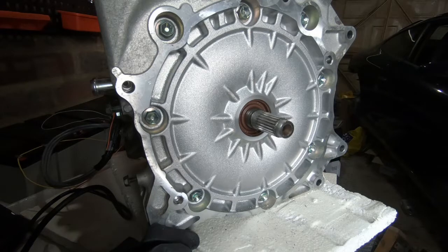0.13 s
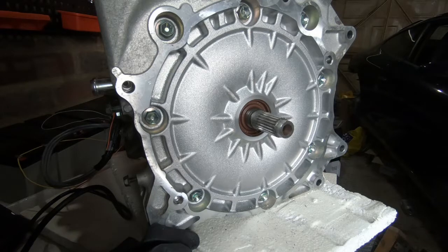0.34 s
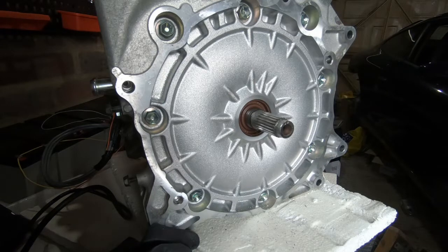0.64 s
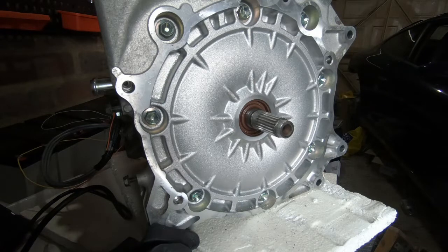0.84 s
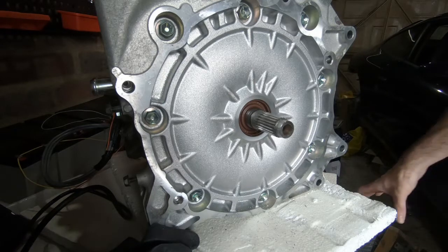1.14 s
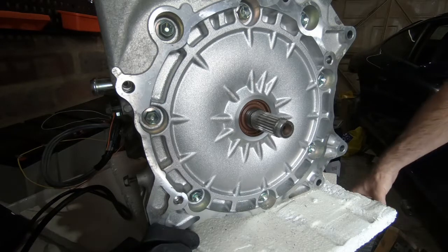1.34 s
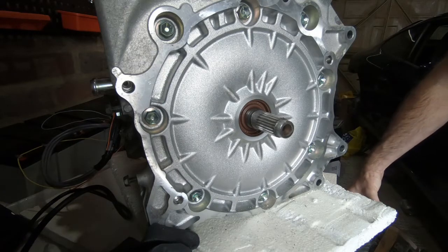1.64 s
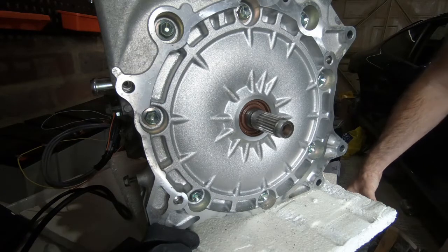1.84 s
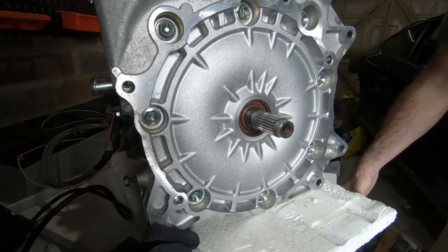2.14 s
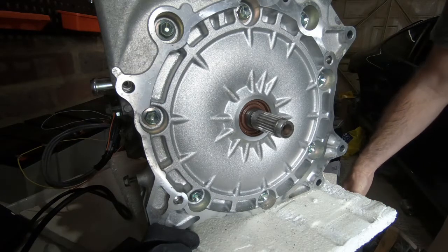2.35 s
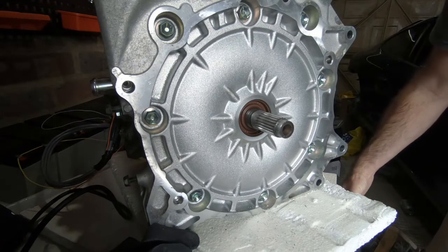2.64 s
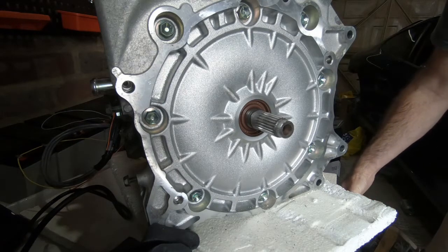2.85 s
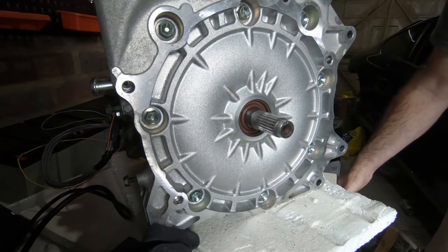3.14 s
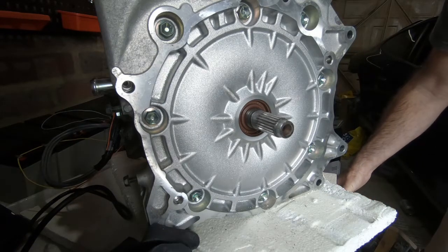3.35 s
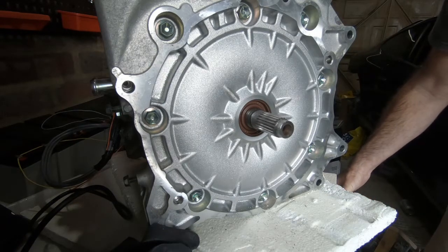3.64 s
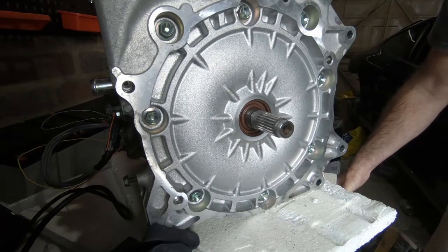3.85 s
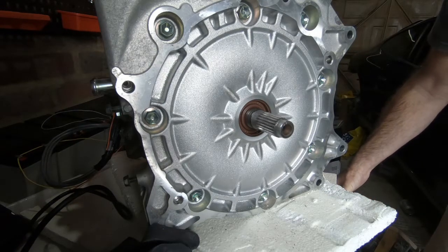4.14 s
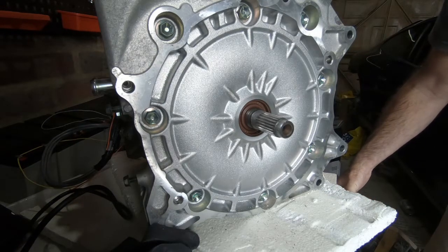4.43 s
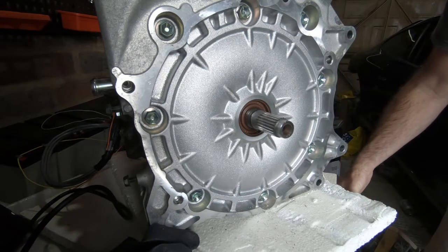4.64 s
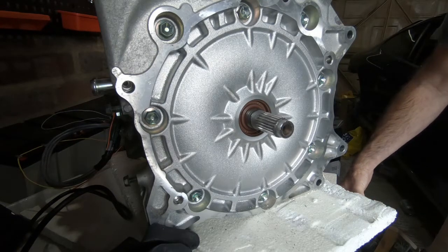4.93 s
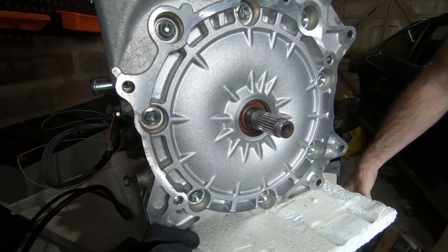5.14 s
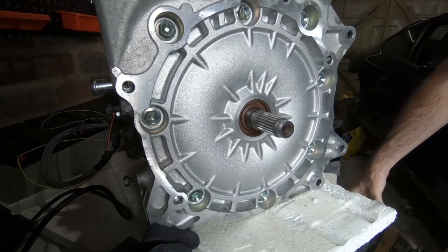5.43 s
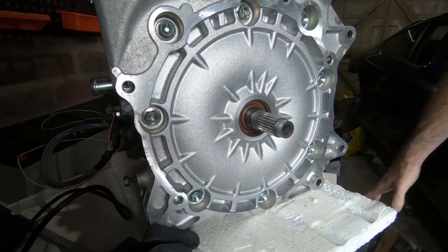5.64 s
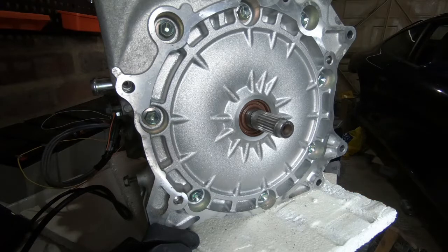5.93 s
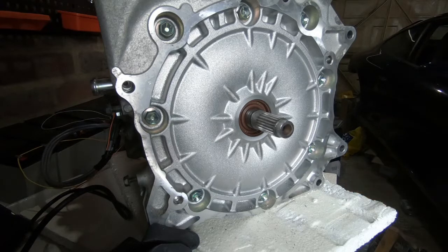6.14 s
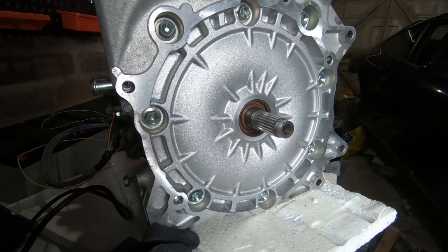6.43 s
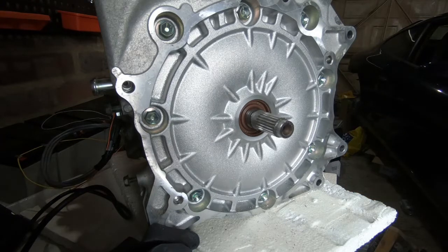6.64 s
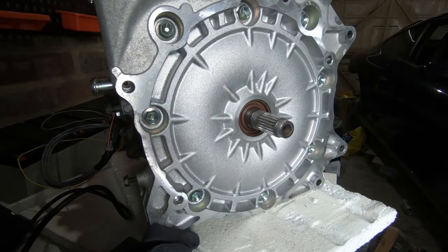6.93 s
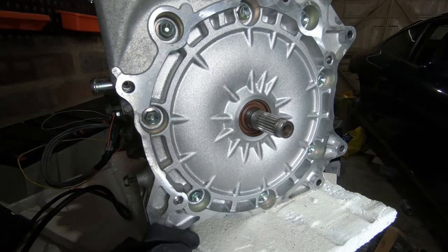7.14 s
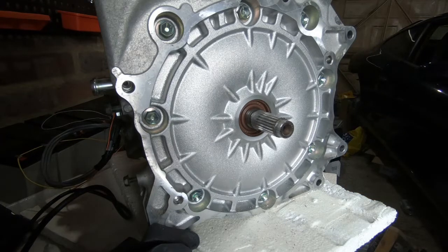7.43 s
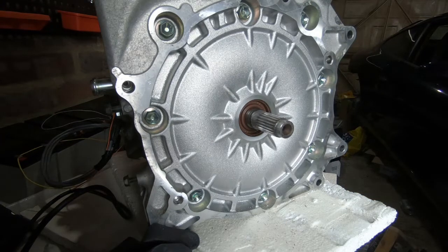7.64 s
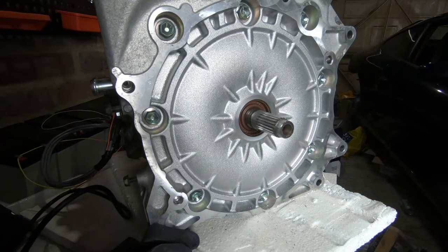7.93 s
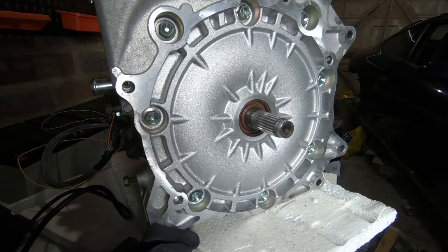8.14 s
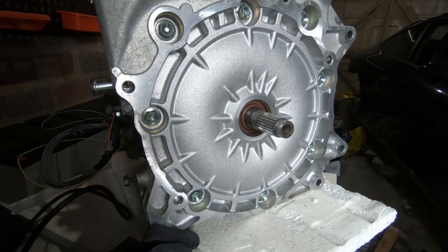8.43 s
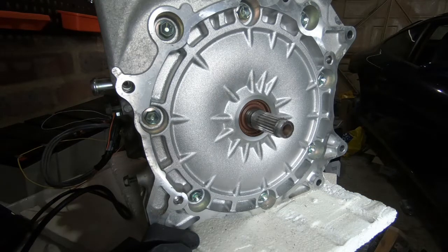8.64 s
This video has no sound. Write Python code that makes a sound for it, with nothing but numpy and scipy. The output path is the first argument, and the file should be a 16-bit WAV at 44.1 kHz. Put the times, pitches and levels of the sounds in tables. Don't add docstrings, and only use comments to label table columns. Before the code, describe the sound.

Deep buzzing motor hum shakes a workbench, sags in pitch and grows into distorted shuddering, then jumps back up and runs on smoothly until a sharp knock.

```python
import sys
import numpy as np
from scipy import signal
from scipy.fft import rfft, irfft, next_fast_len
from scipy.io import wavfile
from scipy.ndimage import uniform_filter1d

SR = 44100
rng = np.random.default_rng(int(sys.argv[2]) if len(sys.argv) > 2 else 0)


def invert_db(level):
    return 10 ** (np.asarray(level, dtype=float) / 20)


def store_wav(level_fs):
    pcm = np.round(np.clip(np.atleast_2d(level_fs), -1, 1) * 32767)
    wavfile.write(sys.argv[1], SR, pcm.T.astype(np.int16))


N = 387638



def ports(pan_db, db=0):
    return invert_db(db + np.reshape([pan_db, 0 * pan_db], (2, -1)))


def peak(x, hz, width):
    return signal.lfilter(*signal.iirpeak(hz, hz / width, fs=SR), x)


def walk(rate):
    k = int(SR / rate)
    held = np.repeat(rng.standard_normal(N // k + 1), k)
    return 1.1 * uniform_filter1d(uniform_filter1d(held, k), k)[:N]


def tone(phase, db, pan_db, lead):
    leads = np.array([lead + 0 * phase, 0 * phase])
    return np.sqrt(2) * ports(pan_db, db) * np.cos(phase + leads)


def bands(table, ref_hz, alike, lag, flicker_db):
    hz, db, pan_db = np.transpose(table)
    n = next_fast_len(N)
    f = np.maximum(np.fft.rfftfreq(n, 1 / SR), 1)
    both, left, right = rfft(rng.standard_normal((3, n)))
    shift = np.array([np.exp(2j * np.pi * f * lag / SR), 1 + 0 * f])
    pair = np.sqrt(alike) * both * shift + np.sqrt(1 - alike) * np.array([left, right])
    colour_db = np.interp(np.log(f), np.log(hz), db, -np.inf, -np.inf)
    pair = pair * ports(np.interp(np.log(f), np.log(hz), pan_db), colour_db)
    out = 0
    for centre in np.arange(np.log2(hz[0]), np.log2(hz[-1]) + 1):
        window = np.cos(np.pi / 2 * np.clip(np.log2(f) - centre, -1, 1)) ** 2
        out = out + irfft(pair * window, n)[:, :N] * invert_db(flicker_db * walk(9))
    return out * np.sqrt(SR / 2 / ref_hz)


def labouring(hz):
    return np.clip((56 - hz) / 5, 0, 1)


def ducking(t):
    # from_s, until_s, depth_db
    ducks = [
        (2.88, 5.38, -6),
        (7.7, 8.9, -1.05),
    ]
    attack_s, release_s = .15, .46
    gain_db = 0
    for start, end, db in ducks:
        sink = 1 - np.exp(-np.clip(t - start, 0, end - start) / attack_s)
        recover = np.exp(-np.maximum(t - end, 0) / release_s)
        gain_db = gain_db + db * sink * recover
    return gain_db


def motion(t, gain_db):
    # time_s, shaft_hz
    speed = [(0, 57.9), (.6, 57.65), (1.2, 58.45), (2.55, 58.55), (2.72, 57.2), (3.35, 51.2), (4.05, 46.66),
             (4.35, 45.2), (4.87, 43.45), (5.1, 51.6), (5.25, 54.9), (5.37, 58.3), (5.65, 60.25),
             (6.55, 60.8), (7.52, 60.85), (7.75, 63.3), (8, 64.45), (8.79, 65.1)]
    # shaft_hz, once_a_turn_db, twice_a_turn_db, fourth_order_db, sixth_order_db
    orders_db = [(43.8, -8.2, 1.6, -23, -19.5), (44.8, -9.1, 2.55, -20, -14), (45.4, -8, 2.1, -24, -18),
                 (46.3, -7.3, .8, -31, -27), (47.6, -8.9, 1.2, -39, -30.5), (49.6, -10.1, 2.35, -40, -31),
                 (51.8, -11.3, 2.05, -36, -35.5), (53.6, -12.6, 2.5, -30, -39),
                 (55.35, -13, -2, -35.5, -56), (57.3, -12.7, -10.8, -38, -60),
                 (58.6, -13.3, -10.6, -42.5, -60), (60.8, -13.9, -9.2, -46, -63),
                 (63.6, -14.3, -6.5, -46, -60), (65.1, -13.7, -8.2, -48, -62)]
    bench_lag_s, sweep_lag_s = .03, .23
    sweep_db_per_hz_s, high_sweep_db_per_hz_s = -.042, -.3
    s, hz = np.transpose(speed)
    hz = uniform_filter1d(np.interp(t, s, hz), size=SR // 16, mode="nearest")
    at_hz, *levels = np.transpose(orders_db)
    late_hz = np.interp(t - bench_lag_s, t, hz)
    once, twice, fourth, sixth = (np.interp(late_hz, at_hz, db) + gain_db for db in levels)
    racing = np.maximum(np.gradient(hz) * SR, 0)
    twice = twice + sweep_db_per_hz_s * np.interp(t - sweep_lag_s, t, racing)
    high_loss_db = high_sweep_db_per_hz_s * racing
    return hz, once, twice, fourth + high_loss_db, sixth + high_loss_db


def shaft(hz, once_db, twice_db, fourth_db, sixth_db):
    # shake_hz, lead_over_shaft_rad, pan_db, left_lead_rad
    bench = [(88, -4.15, -23.5, -2.5), (90.5, -4.1, -25, -2.4), (92.9, -3.4, -28, -1.8),
             (96.6, -3, -25, -1.3), (102.4, -2.7, -21, -1.1), (108.7, -2.9, -17.5, -.8),
             (113.9, -2.6, -10.5, -1.2), (116.8, -2.1, -9, -1.6), (119.2, -1.7, -11, -1.9),
             (121.3, -1.5, -15, -2.2), (125.5, -1.3, -21, -2.1), (129.6, -1, -24.5, -1.9)]
    # shaft_hz, lead_rad
    fourth_lead = [(49.5, -.7), (51, 1.4), (57, 1.3), (59, -1.4)]
    # order, level_db, pan_db
    weak = [(1.5, -16.5, -20.5), (5, -40, -11)]
    turn = 2 * np.pi * np.cumsum(hz) / SR + 4.6
    twice_db = twice_db + .5 * np.clip((sixth_db + 35) / 6, 0, 1)
    bench_hz, *response = np.transpose(bench)
    lead, pan_db, left_lead = (np.interp(2 * hz, bench_hz, r) for r in response)
    twice = 2 * turn + lead
    fourth = 2 * twice + np.interp(hz, *np.transpose(fourth_lead))
    out = tone(turn, once_db + .15 * walk(15), -15, -1.65)
    out += tone(twice, twice_db + .05 * walk(15), pan_db, left_lead)
    out += tone(fourth, fourth_db + walk(10), -17, -2.1)
    out += tone(3 * twice - 2.7, sixth_db, -15, 2.9)
    out += tone(turn + twice + .6, twice_db - 33 + walk(8), -16, 1.5)
    out += tone(turn + twice - 1.8, sixth_db - 11, -20, 1.5)
    free_db = -25 * labouring(hz)
    for order, db, weak_pan_db in weak:
        level_db = once_db + db + free_db * (order < 2) + 2.0 * walk(6.2)
        out += tone(order * turn - .6, level_db, weak_pan_db, 0.6)
    return out


def coil_hum(t, hum_db):
    # sideband_number, level_db, pan_db
    sidebands = [(-2, -18.5, 3), (-1, -8.5, 5), (0, 0, -13), (1, -5, 4.5), (2, -24.5, 0.5)]
    hum_hz, mains_hz = 1288.2, 49.6
    out = 0
    for k, db, pan_db in sidebands:
        phase = 2 * np.pi * (hum_hz + k * mains_hz) * t
        out = out + tone(phase, hum_db + db + 1.0 * walk(6.5), pan_db, 1.7)
    return out


def switching_whine(t, hum_db):
    # time_s, level_db
    swells = [(0.0, -74), (0.05, -75.5), (0.54, -75), (0.59, -69.5), (1.47, -73), (1.56, -80.5),
              (2.5, -66.5), (3.4, -76.5), (4.48, -72.5), (5.21, -82), (5.88, -76.5), (7.39, -74.5),
              (7.56, -66), (7.64, -73), (8.77, -71.5), (8.79, -71)]
    level_db = np.interp(t, *np.transpose(swells)) + 4.0
    phase = 2 * np.pi * 4394.5 * t + 0.44 * walk(10)
    out = tone(phase, level_db + 2.0 * walk(60) + .8 * walk(13), -1.5, 0.092)
    return out + tone(2 * phase, hum_db - 33.5 + 3 * walk(45), -1.5, .5)


def street(t):
    # traffic_db, tyres_db, rumble_db
    quiet_db = (-67, -65.5, -28.5)
    # middle_s, half_length_s, traffic_db, tyres_db,
    # rumble_db
    passes = [(0.494, .6, -59.5, -54.5, -27.5), (1.12, .4, -55, -55, -28), (1.6, 0.41, -59, -52, -27.5),
              (2.203, 0.43, -57, -51, -26.5), (3.099, .25, -55.5, -54, -26), (3.8, .6, -58, -54, -27),
              (4.4, 0.2, -51.5, -53.5, -26), (4.849, .5, -55.5, -52.5, -22.5), (5.401, 0.33, -59, -51, -31),
              (5.922, .35, -60, -50.5, -30), (6.748, 0.58, -63, -57.5, -34.5),
              (7.45, 0.36, -68.5, -63, -32)]
    power = invert_db(np.array(quiet_db))[:, None] ** 2
    for s, half, *db in passes:
        swell = 1 / (1 + ((t - s) / half) ** 4)
        power = power + (invert_db(np.array(db))[:, None] * swell) ** 2
    return 10 * np.log10(power)


def passing_traffic(traffic_db, tyres_db, rumble_db):
    # pitch_hz, level_db_per_hz, pan_db
    rumble = [(89, -20, -9.5), (130, -4.5, -9), (157, -9.5, -8), (246, -20.5, -6.5), (426, -27, -7),
              (654, -37, -11), (1540, -48, -4.5)]
    wash = [(500, -10, -6.5), (1000, 1.5, -5), (1380, 5, -4), (2100, -3.5, -4), (3700, -13.5, -5.5),
            (4770, -23.5, -4), (6500, -23, -4.5), (9200, -41.5, -5.5)]
    tyres = [(520, -22, -5), (760, -5.5, -2), (910, -0.5, -6), (1240, -2, -5.5), (1460, -12, -3),
             (2000, -25.5, -4.5)]
    out = invert_db(rumble_db) * bands(rumble, 120.0, 0.43, -6, 0.99)
    out += invert_db(traffic_db + 5.5) * bands(wash, 1750., 0.66, 4, 1.5)
    return out + invert_db(tyres_db + 4.0) * bands(tyres, 430.0, 0.15, 7.8, 2.1)


def engines(t):
    # middle_s, half_length_s, pitch_hz, level_db, pan_db
    engine_notes = [
        (.8, .8, 138, -40, -2),
        (.4, .25, 42, -35, -3),
        (.9, .25, 36, -37, -3),
        (2.45, .4, 135, -40, -2),
        (2.3, .2, 42, -35, -3),
        (2.7, .35, 68, -28, -5),
        (2.75, .2, 42, -29, -4),
        (6.5, .8, 38, -35, -2),
        (6.4, .35, 72, -36, -2),
        (7.5, .15, 225, -50, -2),
    ]
    out = np.zeros((2, N))
    for s, half, hz, db, pan_db in engine_notes:
        swell = np.cos(np.pi / 2 * np.clip((t - s) / half, -1, 1))
        phase = 2 * np.pi * hz * t + 1.5 * walk(6.5)
        out += swell * tone(phase, db + 2.5 * walk(11.0), pan_db, 0.47)
    return out


def room_floor(shaft_hz, hum_db):
    # pitch_hz, level_db_per_hz, pan_db
    hiss = [(2000, -7.5, -4), (4620, -6.5, -3.5), (6000, 0, -7), (9000, -5.5, -4), (11200, -10.5, -5),
            (12900, -16.5, -6.5), (13600, -30.5, -5.5)]
    deep = [(14.1, -7, -5.5), (25, -4.5, -7.5), (45, 0, -6), (79, -3.5, -10), (114, -6, -9),
            (161, -22, -10)]
    out = invert_db(1.219 * hum_db - 8) * bands(hiss, 3000., 0.27, 1.7, 0.87)
    deep_db = hum_db + 22 - 3.2 * labouring(shaft_hz)
    return out + invert_db(deep_db) * bands(deep, 100., 0.84, -3.5, 0.97)


def drones(hum_db):
    # pitch_hz, width_hz, level_over_hum_db, pan_db
    lines = [(100, 3, 7, -2), (199.5, 3, 2, -4), (245, 3, -5, -3), (317.6, 3, -4, -3)]
    out = np.zeros((2, N))
    for hz, width, db, pan_db in lines:
        noise = peak(peak(rng.standard_normal(N), hz, width), hz, 4 * width)
        noise = noise * np.sqrt(SR / np.pi / width)
        out += ports(pan_db, db) * invert_db(hum_db + 3.7 * walk(1.6)) * noise
    return out


def creaks():
    # start_s, peak_db, low_share_db
    slips = [(0.5665, -46, -3), (0.9833, -53, 4), (1.0984, -57.5, 6), (1.1995, -61, 8), (1.2694, -60, 3.5),
             (1.7813, -48.5, 6), (2.2101, -43, 2.1), (2.4496, -59, 9.5), (3.8489, -56.5, 2),
             (4.1509, -58, 4), (4.3108, -56.5, 5.5), (4.4469, -57, 12.5), (6.7393, -38, -13),
             (6.7985, -54, -2.5), (7.19, -52, -9), (7.271, -47, -6), (7.3952, -44.5, -16.5),
             (7.4928, -22.5, -23), (7.4997, -25, -20.5), (7.507, -31, -6), (7.5291, -38, -9.5),
             (7.5593, -39, -17), (7.9397, -58.5, 0)]
    # pitch_hz, width_hz, level_db
    case = [(505, 200, -1.5), (835, 400, 1.5), (1430, 260, 4.5), (2850, 2300, 0.5), (6700, 1200, -4),
            (7700, 2100, -1), (9200, 4300, -11.5)]
    scrape_t60_s, scrape_db = .2, -8.5
    n = SR // 3
    out = np.zeros((2, N + SR))
    t = np.arange(n) / SR
    tick = 1.2 * np.exp(-(t - .001) ** 2 / .0006 ** 2)
    fade = (1 - np.exp(-t / 0.0015)) * 1000. ** (-t / scrape_t60_s)
    for s, db, low_db in slips:
        both, grain, *own = rng.standard_normal((4, n))
        scrape = fade * invert_db(scrape_db + 33 * uniform_filter1d(grain, size=60))
        rub = np.array([both, np.roll(both, shift=1)]) + 0.57 * np.array(own)
        push = rub * (tick + scrape)
        ring = 0
        for hz, width, mode_db in case:
            mode = peak(peak(push, hz, width), hz, width) / np.sqrt(width / 3000)
            ring = ring + invert_db(mode_db + low_db * (hz < 4500)) * mode
        out[:, int(s * SR):][:, :n] += ports(-5.5, db + 3.5) * ring
    return out[:, :N]


def knocks():
    # start_s, level_db, pitch_hz, t60_s
    hits = [(7.4945, -28, 1350, .03), (7.496, -30, 750, .05), (7.502, -28, 450, .06), (7.5, -34, 2300, .04),
            (7.514, -33, 1200, .05), (7.56, -42, 900, .05), (6.745, -44, 1700, .08), (6.76, -41, 1100, .12),
            (6.79, -46, 1200, .1), (6.93, -46, 1000, .1), (7.29, -46, 550, .08), (2.6, -45, 900, .05),
            (4.447, -53, 3300, .04)]
    out = np.zeros((2, N + SR))
    t = np.arange(SR // 8) / SR
    for s, db, hz, t60 in hits:
        contact = rng.standard_normal((2, len(t))) * 1000. ** (-t / t60)
        ring = peak(peak(contact, hz, hz / 2), hz, hz) * np.sqrt(SR / hz)
        out[:, int(s * SR):][:, :len(t)] += ports(-7.0, db - .3) * ring
    return out[:, :N]


def rattle(hz, sixth_db):
    # pitch_hz, width_hz, level_under_sixth_order_db
    loose = [(2000, 1200, -38), (6000, 2500, -47)]
    phase = np.cumsum(2 * hz) / SR
    strength_db = 4. * rng.standard_normal(N // 100)[phase.astype(int)]
    taps = np.exp(-(phase % 1) / .2) * invert_db(strength_db) * rng.standard_normal((2, N))
    buzz = 0
    for f, width, db in loose:
        buzz = buzz + invert_db(db) * peak(peak(taps, f, width), f, width) * np.sqrt(SR / width)
    return ports(-5.5, sixth_db) * buzz


def scene():
    t = np.arange(N) / SR
    gain_db = ducking(t)
    hum_db = -48.5 + gain_db
    spin = motion(t, gain_db)
    shaft_hz, sixth_db = spin[0], spin[4]
    motor = shaft(*spin) + coil_hum(t, hum_db) + switching_whine(t, hum_db)
    outside = passing_traffic(*(street(t) + gain_db)) + engines(t)
    garage = room_floor(shaft_hz, hum_db) + drones(hum_db)
    return motor + outside + garage + creaks() + knocks() + rattle(shaft_hz, sixth_db)


def low_pass(x):
    return signal.sosfilt(signal.butter(12, 15480, fs=SR, output="sos"), x)


def record(dry):
    return low_pass(np.clip(dry, -1, 1))


dry = scene()
out = record(dry)
store_wav(out)
```